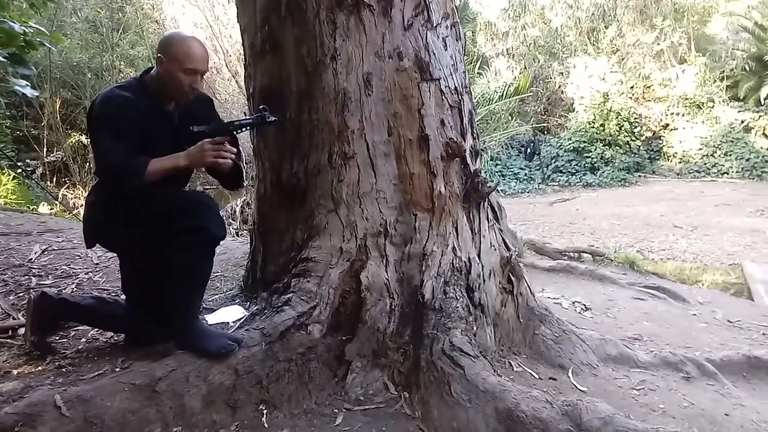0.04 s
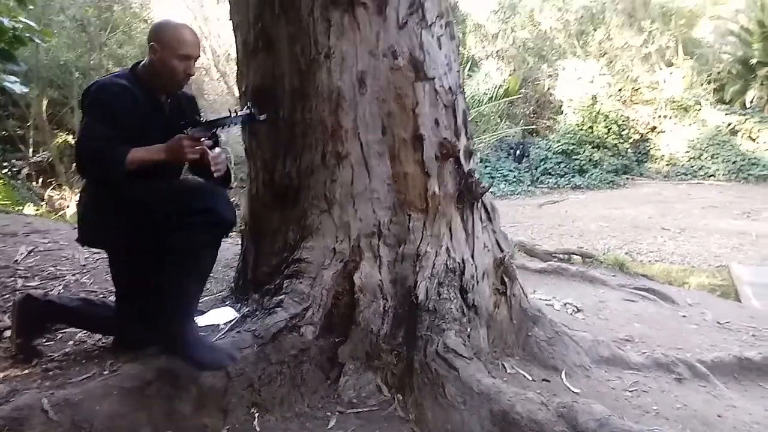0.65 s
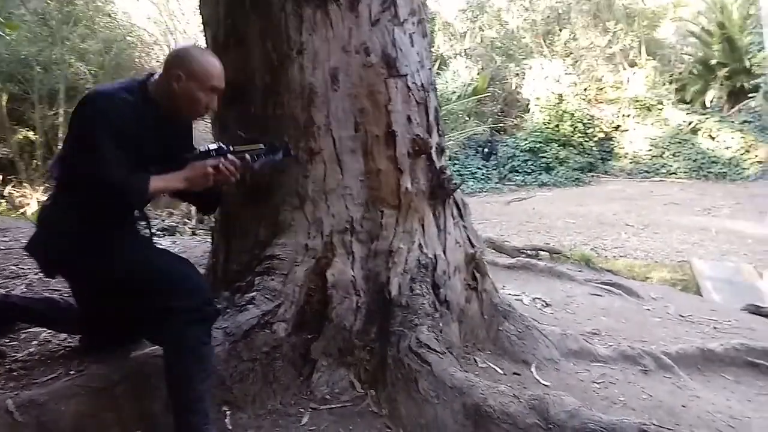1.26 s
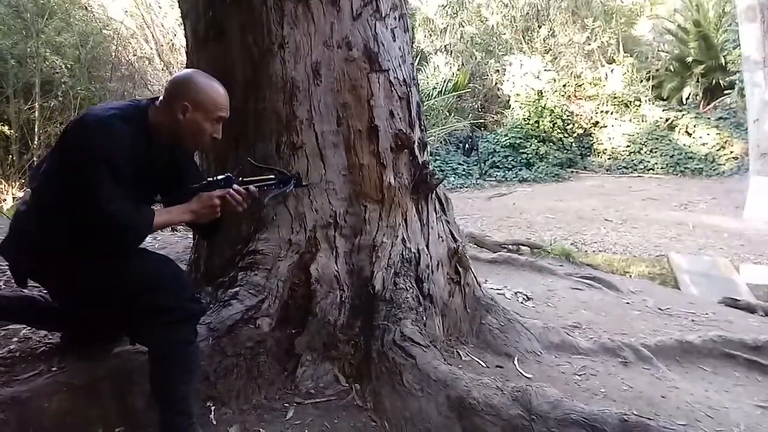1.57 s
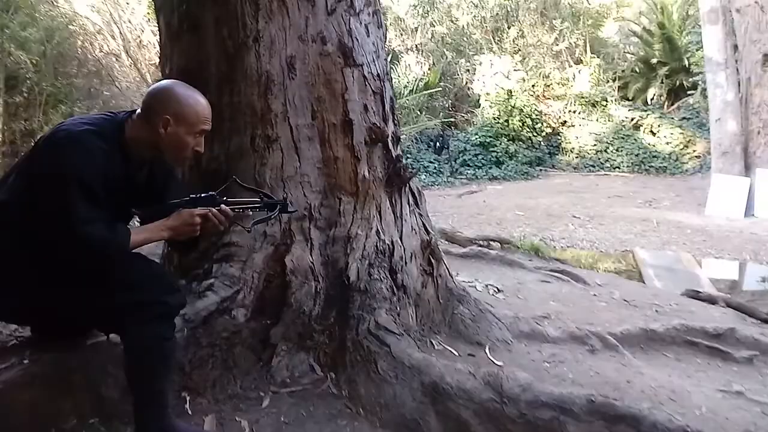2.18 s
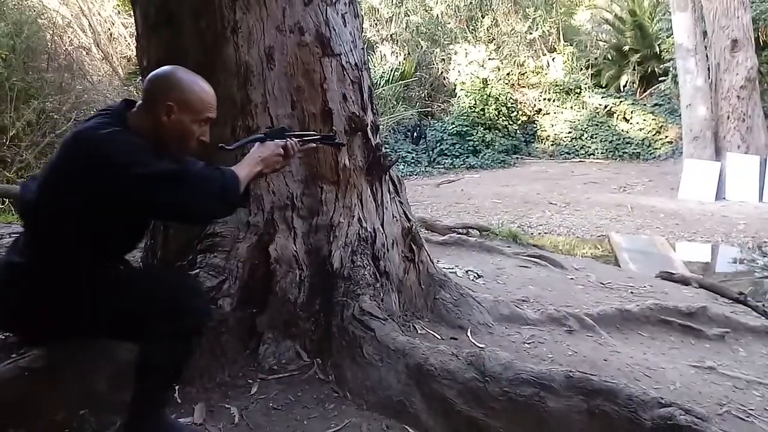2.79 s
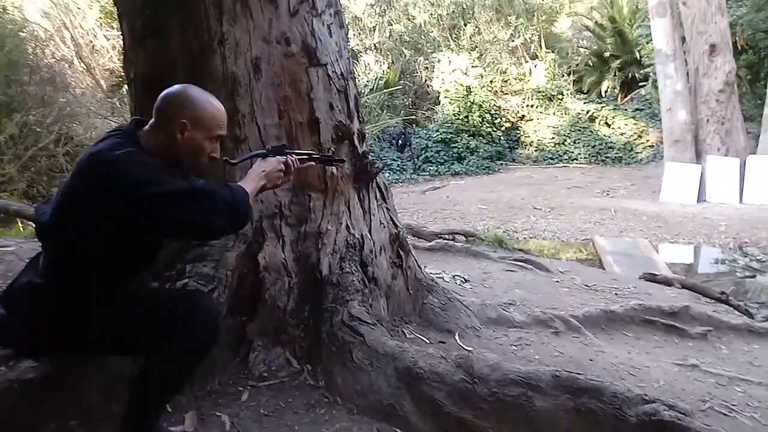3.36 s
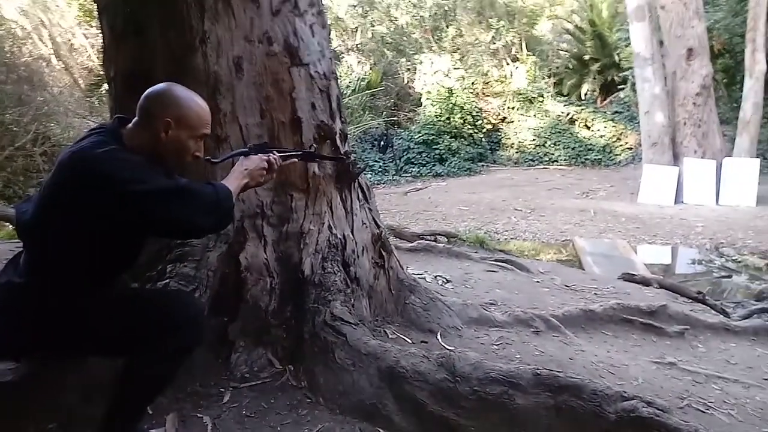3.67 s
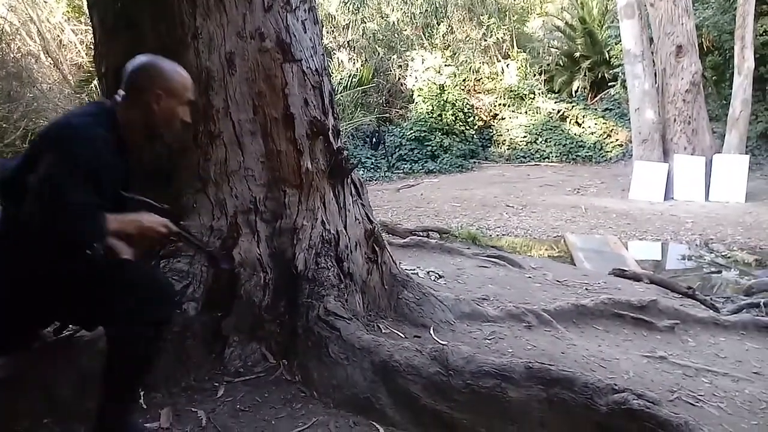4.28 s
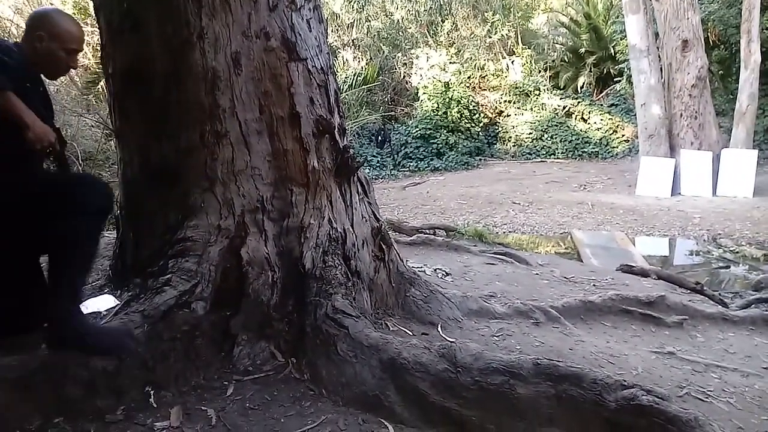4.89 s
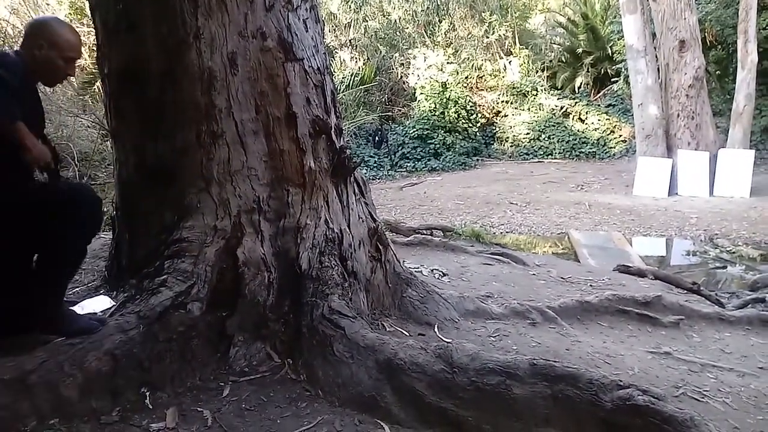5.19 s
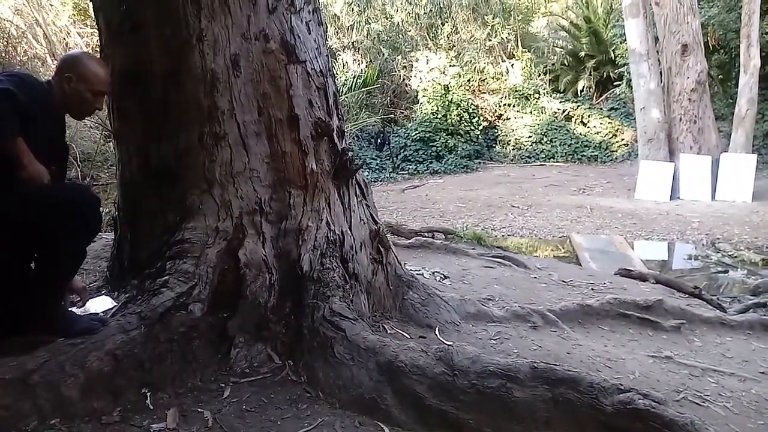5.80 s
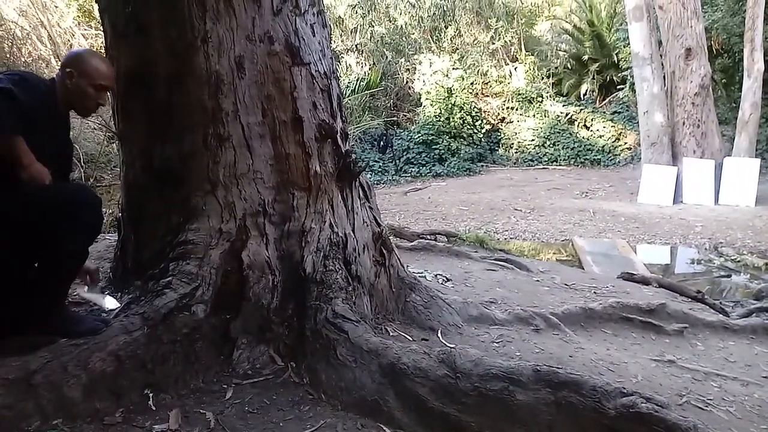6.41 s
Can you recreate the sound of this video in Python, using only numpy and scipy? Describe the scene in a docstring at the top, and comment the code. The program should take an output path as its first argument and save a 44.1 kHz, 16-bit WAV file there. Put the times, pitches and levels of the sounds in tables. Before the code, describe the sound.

A small crossbow is readied with clicks and sleeve rustle, then fires with a sharp snap and a bolt thuds into a board outdoors.

```python
"""Under a big tree, an archer readies a pistol crossbow: sleeves rustle, the stock clacks, the catch ticks.
The latch lets go, the string slams home and the metal frame rings; a quarter second later the bolt
thuds into a target board. Trunks and bushes scatter both hits back, and feet scuff the dirt.
Underneath sit a soft, distant rumble and a low flutter, with a dull bump early and a light gust late."""
import sys
import numpy as np
from scipy import signal
from scipy.fft import rfft, irfft
from scipy.io import wavfile
from scipy.ndimage import uniform_filter1d

SR = 44100
rng = np.random.default_rng(int(sys.argv[2]) if len(sys.argv) > 2 else 0)


def transcribe(u):
    """Save the signal u as a 16-bit wav file named by the first command-line argument.

    u: samples, shape (n,) or (channels, n), limited to [-1, 1]; the rate is SR.
    q: integer samples, one column per channel.
    """
    v = np.clip(np.atleast_2d(u).T, -1, 1)
    q = np.round(v * 32767).astype(np.int16)
    wavfile.write(sys.argv[1], SR, q)


N = 293265


# latch, string and limb hits: (time [s], level [dB], decay t60 [s])
RELEASE_HITS = [(3.668, -16, 0.024), (3.6737, -4, 0.013), (3.6756, -7, 0.024), (3.6806, -13, 0.036),
                (3.6862, -33, 0.012)]
# ring of the metal frame and string: (frequency [Hz], level [dB])
FRAME_MODES = [(405, -41.5), (1800, -46.5), (1938, -53.5), (3526, -44), (4253, -44), (4358, -49.5),
               (4472, -35), (4755, -60), (4980, -43), (5405, -33.5), (6239, -43.5), (6428, -44),
               (6617, -31), (6853, -38), (7480, -34.5)]
# bright EQ of the snap: (frequency [Hz], gain [dB])
SNAP_EQ = [(60, -23), (200, -14), (400, -15), (520, -71), (900, -9.5), (1500, -16), (1850, -3.5),
           (2500, -9), (3500, 0), (4400, 5), (5300, -5), (6500, 4), (7600, -0.5), (10000, -6.5),
           (16000, -3)]

def shot(frame_t60_s=0.32):
    """The latch trips, the string hits its stop and rebounds, and the frame rings."""
    hits = contacts(RELEASE_HITS)
    tail = woods(hits, t60=0.46, echo_s=0.079, echo_db=-8.0, echo_t60=0.3, treble_life_s=0.053)
    snap = colour(hits + from_db(-4.5) * tail, SNAP_EQ)
    frame = ring(RELEASE_HITS[2][0], [(hz, db, frame_t60_s) for hz, db in FRAME_MODES])
    return snap + frame


# the bolt punches in and its shaft slaps the hole: (time [s], level [dB], decay t60 [s])
BOLT_HITS = [(3.9005, -15.5, 0.069), (3.903, -19, 0.021), (3.9068, -12.5, 0.024), (3.9092, -17, 0.022)]
# body of the board and bolt shaft: (frequency [Hz], level [dB], decay t60 [s])
BOARD_MODES = [(126.5, -29.5, 0.44), (178, -21.5, 0.065), (249.5, -30, 0.21), (354.6, -16.5, 0.091),
               (378.4, -26, 0.36), (688, -22.5, 0.055), (737, -19.5, 0.047), (1440, -17, 0.024),
               (1500, -49, 0.29), (1605, -44, 0.24), (1860, -14, 0.013), (2160, -37.5, 0.8),
               (2140, -7, 0.013), (2300, -43, 0.26), (2760, -40, .3), (4460, -4, 0.18)]
# EQ of the bolt's crack: (frequency [Hz], gain [dB])
CRACK_EQ = [(60, -1), (200, -20), (1050, -9.5), (2100, 1), (3300, -18), (4500, 2.5), (6500, -6.5),
            (10000, -10.5), (16000, -5)]
# darker EQ of its tail from the trees: (frequency [Hz], gain [dB])
TAIL_EQ = [(60, -19), (150, 3), (380, 4.5), (560, -1), (750, 0), (1050, -4.5), (2100, 0), (3300, 0.5),
           (4500, 1.5), (6500, -5), (10000, -15.5), (16000, -21)]

def target():
    """The board booms once as the bolt cracks through it; the crack comes back from the trees."""
    hits = contacts(BOLT_HITS)
    body = ring(BOLT_HITS[0][0], BOARD_MODES)
    boom = band(body, 100, 1570)  # a small soft board radiates neither deep bass nor treble
    tail = woods(hits, t60=0.61, echo_s=0.042, echo_db=-0.5, echo_t60=0.26, treble_life_s=0.069)
    return colour(hits, CRACK_EQ) + from_db(-2.5) * boom + from_db(-1.0) * colour(tail, TAIL_EQ)


def woods(hits, t60, echo_s, echo_db, echo_t60, treble_life_s):
    """A diffuse tail off the ground and bushes, with a smeared slapback from the farther trunks."""
    t = np.arange(SR) / SR
    near = from_db(-60 * t / t60) * np.minimum(t / 0.004, 1) ** 2
    far_attack = np.clip((t - echo_s) / 0.01 + 1, 0, 1)
    far = from_db(echo_db - 60 * np.abs(t - echo_s) / echo_t60) * far_attack
    spread = near ** 2 + far ** 2
    treble_fade = np.exp(-t / treble_life_s)  # leaves soak up the treble sooner
    tail = 0
    for fade, low_hz, high_hz in [(1, 40, 8000), (treble_fade, 8000, 20000)]:
        energy = signal.fftconvolve(hits ** 2, fade * spread / spread.sum())[:N]
        tail += np.sqrt(np.abs(energy)) * band(rng.standard_normal(N), low_hz, high_hz)
    return tail


# hands and bolt knock against the stock: (time [s], level [dB], hardness [dB])
STOCK_CLACKS = [(0.0299, -25, -2), (0.6934, -26.5, 0), (1.1402, -22, -7), (1.5802, -26, -2),
                (1.601, -29, -6), (1.736, -15, 1.5), (2.036, -11, -0.5), (2.173, -13.5, -0.5),
                (3.295, -28, -5)]

def stock():
    """Full clacks with a broad, low knock; a harder hit gains some knock and even more top edge."""
    clacks = np.zeros(N)
    for s, level_db, hard_db in STOCK_CLACKS:
        edge_db = 1.5 + 1.7 * hard_db
        clack = click((1150, 2980), knock_db=hard_db, ring_db=1.5, edge_db=edge_db, scatter_db=-25.5)
        clacks += placed(s, from_db(level_db) * clack)
    return clacks


# the catch and other small metal parts: (time [s], level [dB], metal ring [dB])
CATCH_TICKS = [(2.4916, -6.5, -2), (2.5591, -7.5, -22), (2.6074, -22, 0), (2.7207, -24.5, -4),
               (2.773, -34, 3), (2.801, -28.5, -20), (3.344, -28.5, 0)]

def catch():
    """Small metal parts tick, thin and dry, with a narrow, high knock."""
    ticks = np.zeros(N)
    for s, level_db, ring_db in CATCH_TICKS:
        tick = click((2510, 3760), knock_db=2.5, ring_db=ring_db, edge_db=-18.5, scatter_db=-30)
        ticks += placed(s, from_db(level_db) * tick)
    return ticks


def click(knock_band_hz, knock_db, ring_db, edge_db, scatter_db):
    """Hard parts touch: a gritty attack with ground scatter, a knock and a brief metal ring."""
    touch = from_db(-4.5) * burst(t60=0.007) + from_db(scatter_db) * burst(t60=0.26)
    touch[0] += from_db(7)  # the sharp transient of first contact
    knock = from_db(knock_db) * band(touch, *knock_band_hz)
    metal = from_db(ring_db) * band(touch + from_db(-16.0) * burst(t60=0.081), 5460, 7500)
    edge = from_db(edge_db) * band(touch, 9400, 19400)
    return band(touch, 4170, 6840) - knock + metal + edge


# rustle bed as the archer kneels, leans in to aim, holds still, crouches aside: (start [s], level [dB])
POSTURE_LEVELS = [(0, -60), (1.65, -54.5), (3.37, -62.5), (4.85, -66.5)]
# crisp, bright brushes of a sleeve on the body: (time [s], level [dB], half length [s])
SLEEVE_BRUSHES = [(0.01, -39, 0.051), (0.42, -52, 0.054), (0.534, -50, 0.15), (0.69, -44.5, 0.045),
                  (1.142, -46.5, 0.029), (1.603, -50, 0.05), (2.166, -42.5, 0.039), (2.96, -46.5, 0.024),
                  (3.035, -47.5, 0.094), (3.29, -44.5, 0.058)]
# duller scrapes of a foot on dirt: (time [s], level [dB])
FOOT_SCRAPES = [(4.253, -50), (4.327, -51), (5.159, -51.5), (6.431, -54)]

def rustle(settle_s=0.08, fidget_db=1, fidgets_per_s=5):
    """Cloth and leaf litter crackle with the movement; each brush or scrape is a swell of grains."""
    posture_db = np.zeros(N)
    for s, level_db in POSTURE_LEVELS:
        posture_db[round(s * SR):] = level_db
    settled_db = uniform_filter1d(posture_db, round(settle_s * SR))
    posture = from_db(settled_db - fidget_db * drift(fidgets_per_s))
    # the arm stirs the cloth more softly and for longer around each brush
    arms = sum(swell(s, level_db - 10, half_s=0.31) for s, level_db, _ in SLEEVE_BRUSHES)
    brushes = sum(swell(s, level_db, half_s) for s, level_db, half_s in SLEEVE_BRUSHES)
    scrapes = sum(swell(s, level_db, half_s=0.052) for s, level_db in FOOT_SCRAPES)
    cloth = from_db(2 * drift(24.64)) * crackle(per_s=2200, spread_db=2.0)
    grains = from_db(1.2 * drift(55)) * crackle(per_s=2000, spread_db=3.5)
    sleeves = brushes * (band(grains, 2800, 6900) + from_db(9) * band(grains, 10100, 12000))
    feet = scrapes * band(grains, 2300, 7700)
    bed = np.hypot(posture, arms) * (cloth + creases())
    return bed + from_db(4.5) * (sleeves + feet)


def creases():
    """Single creases and dry leaves snap out of the rustle, in six narrow treble bands."""
    edges_hz = np.geomspace(4000, 13100, 7)
    bands_hz = zip(edges_hz, edges_hz[1:])
    snaps = sum(band(crackle(per_s=22, spread_db=2.5), low, high) for low, high in bands_hz)
    return from_db(-4.5) * snaps


# EQ of the cloth grains: (frequency [Hz], gain [dB])
CLOTH_EQ = [(300, 6.5), (1500, 4.5), (3000, 4.5), (6000, 5.5), (11000, -9.5), (16000, -0.5)]

def crackle(per_s, spread_db):
    """Cloth texture: random grains of uneven size, at unit power."""
    sizes = from_db(spread_db * np.minimum(rng.exponential(1, N), 4))
    polarity = rng.choice([-1, 1], N)
    triggers = rng.random(N) < per_s / SR
    return rms_one(colour(sizes * polarity * triggers, CLOTH_EQ))


# bass-heavy EQ of the distant ambience: (frequency [Hz], gain [dB])
RUMBLE_EQ = [(28, -10.5), (50, -14), (78, 3.5), (125, -8), (200, -5), (380, -5.5), (520, -10.5),
             (750, -7.5), (1200, -11.5), (2100, -16.5), (2800, -24.5), (4600, -22), (8000, -37),
             (12500, -30.5), (15500, -16.5)]

def rumble(level_db=-47.5):
    """A steady bed of far-off rumble and faint hiss."""
    return from_db(level_db) * rms_one(colour(rng.standard_normal(N), RUMBLE_EQ))


# two soft low swells, a dull bump of handling or a footstep, then a light gust: (time [s], level [dB])
LOW_SWELLS = [(0.9, -52.5), (6.0, -59)]

def low_flutter(start_db=-53, ease_db_per_s=1):
    """A bassy flutter of light air eases off steadily; a dull bump and a later gust swell out of it."""
    easing = from_db(start_db - ease_db_per_s * np.arange(N) / SR)
    swells = sum(swell(s, level_db, half_s=0.42) for s, level_db in LOW_SWELLS)
    flutter = from_db(2.7 * drift(12))
    return (easing + swells) * flutter * rms_one(band(rng.standard_normal(N), 61, 188))


def contacts(hits):
    """One noise burst for each (time [s], level [dB], decay t60 [s])."""
    return sum(placed(s, from_db(db) * burst(t60)) for s, db, t60 in hits)


def burst(t60, size=8192):
    """Tiny collisions that die away; starts near unit power."""
    fade = from_db(-60 * np.arange(size) / SR / t60)
    return rms_one(rng.standard_normal(size) * fade) * np.sqrt(np.mean(fade ** 2))


def ring(s, modes):
    """Damped modes set off by a hit at time s."""
    t = np.arange(SR) / SR
    partials = (from_db(db - 60 * t / t60) * np.cos(2 * np.pi * hz * t) for hz, db, t60 in modes)
    return placed(s, sum(partials))


def swell(s, level_db, half_s):
    """An envelope that rises to a peak at time s and falls back alike."""
    return from_db(level_db) * np.maximum(1 - np.abs(np.arange(N) / SR - s) / half_s, 0) ** 2


def drift(per_s):
    """A random modulator gliding between values of spread 1."""
    knots = rng.standard_normal(400)
    return np.interp(np.arange(N) / SR * per_s, np.arange(len(knots)), knots)


def placed(s, sound):
    """A short sound laid on the timeline at time s."""
    return np.pad(sound, (round(s * SR), N))[:N]


def band(x, low_hz, high_hz):
    """Gentle causal band-pass."""
    sos = signal.butter(2, [low_hz, high_hz], "band", fs=SR, output="sos")
    return signal.sosfilt(sos, x + 1e-18)


def colour(x, points, size=8192):
    """Minimum-phase EQ through points of (frequency [Hz], gain [dB])."""
    hz, db = np.transpose(points)
    grid_hz = np.maximum(np.arange(size // 2 + 1) * SR / size, 1)
    gain = from_db(np.interp(np.log(grid_hz), np.log(hz), db))
    cepstrum = irfft(np.log(gain))
    cepstrum[1:size // 2] *= 2  # folded forward, so nothing rings ahead of a transient
    cepstrum[size // 2 + 1:] = 0
    impulse = irfft(np.exp(rfft(cepstrum)))
    return signal.fftconvolve(x, impulse)[:N]


def from_db(db):
    """Decibels to gain."""
    return 10 ** (np.asarray(db) / 20)


def rms_one(x):
    """Scale to unit power."""
    return x / np.sqrt(np.mean(x ** 2) + 1e-20)


def scene():
    """The mono mix, heard a few steps from the archer."""
    return (stock() + catch() + rustle() + shot() + target() + rumble() + low_flutter())[None]


# response of the microphone: (frequency [Hz], gain [dB])
MICROPHONE_EQ = [(100, 1), (2100, 2), (2900, -3.5), (3400, -5), (4000, -3.5), (4450, -0.5), (5300, 0.5),
                 (6600, 5), (7200, -1), (8200, -14), (11500, -14.5), (13500, -23), (15300, -20)]

def record(dry, cutoff_hz=16200):
    """A small microphone whose port resonates in the presence range and passes little above it."""
    heard = colour(dry[0], MICROPHONE_EQ)
    high_cut = signal.ellip(10, 0.2, 80, cutoff_hz, fs=SR, output="sos")
    return signal.sosfilt(high_cut, heard)[None]


dry = scene()
out = record(dry)
transcribe(out)
```